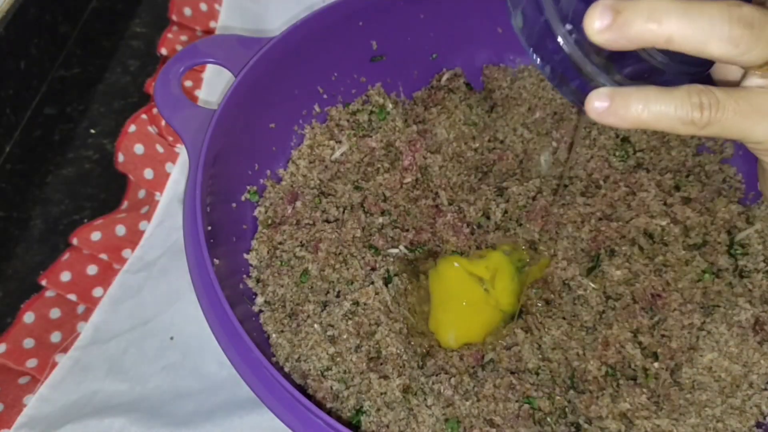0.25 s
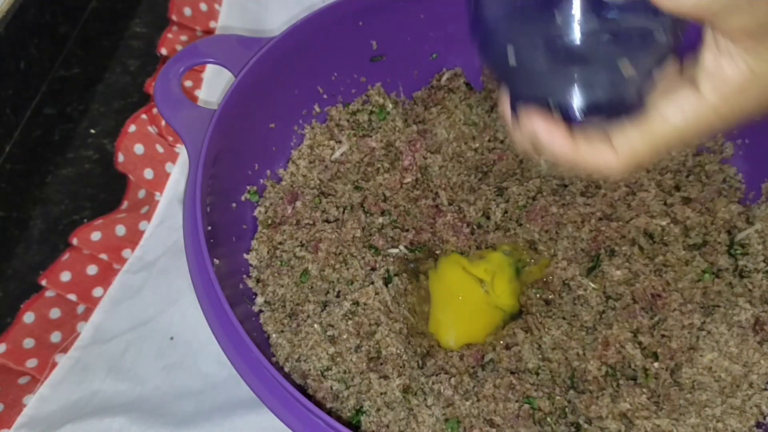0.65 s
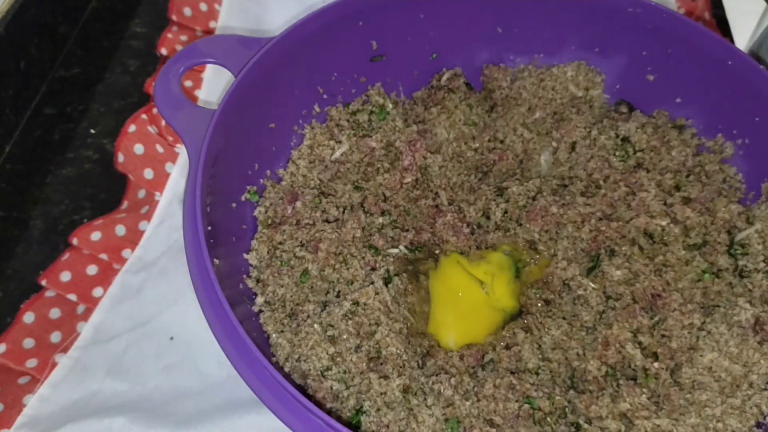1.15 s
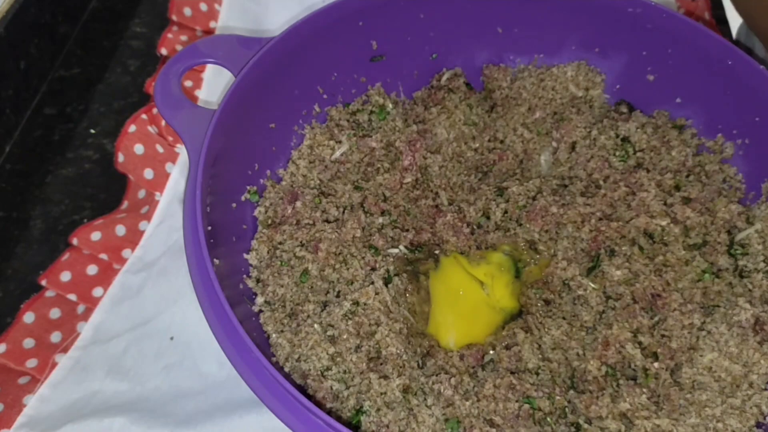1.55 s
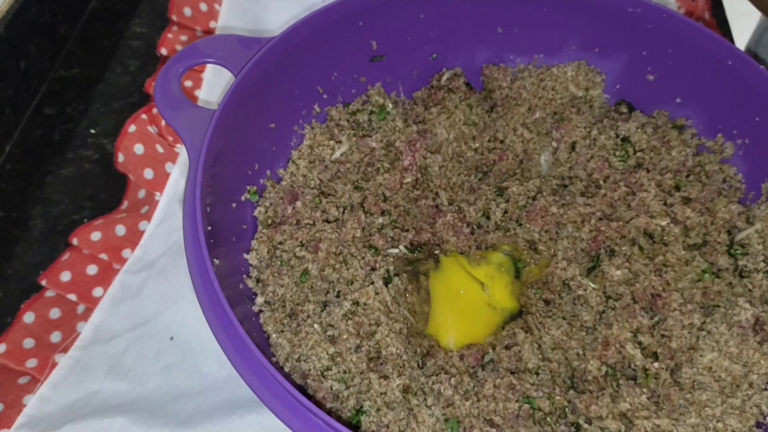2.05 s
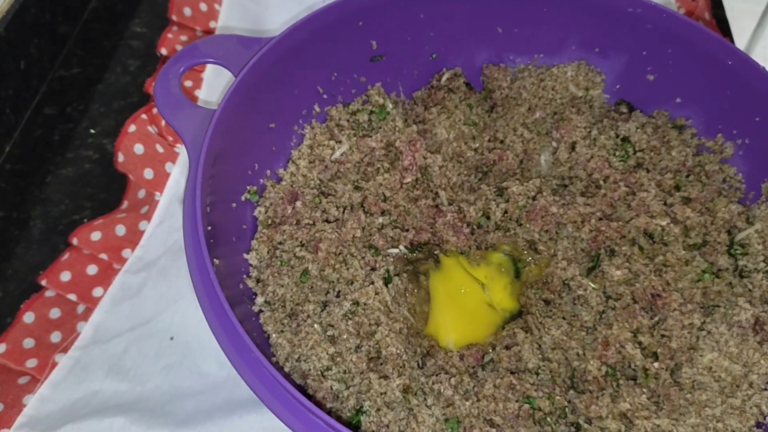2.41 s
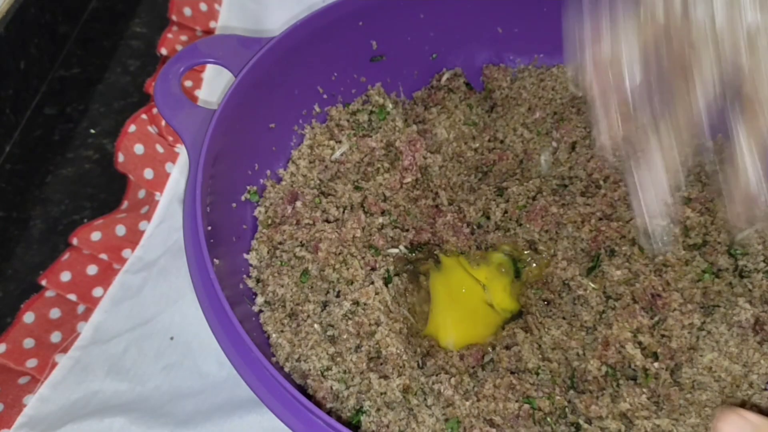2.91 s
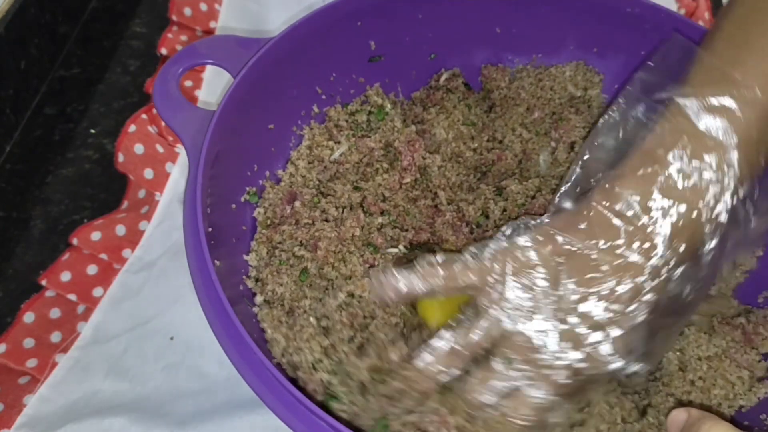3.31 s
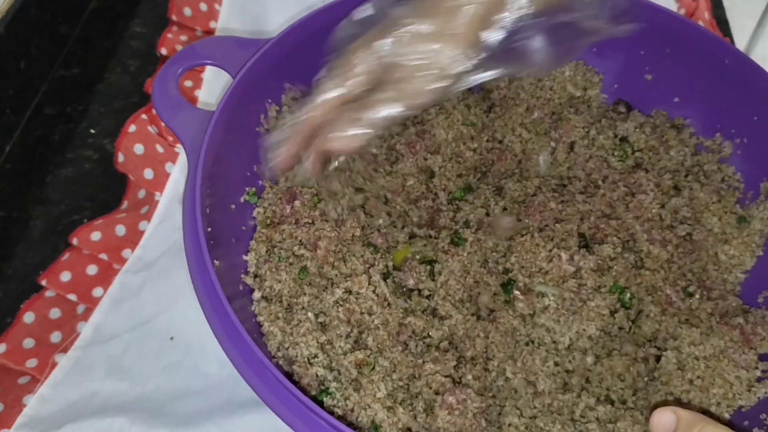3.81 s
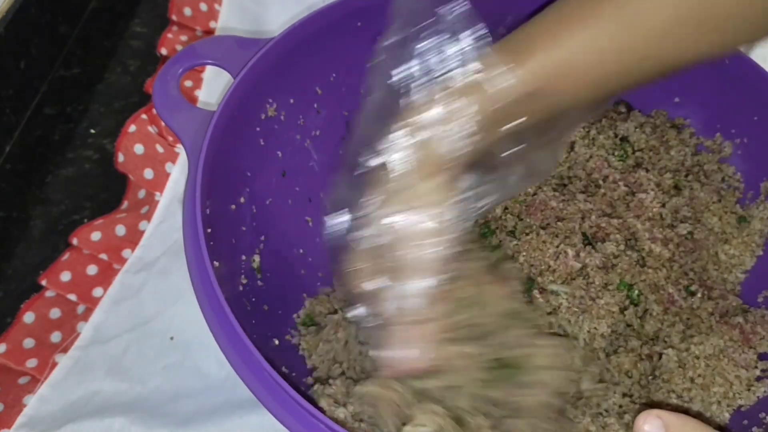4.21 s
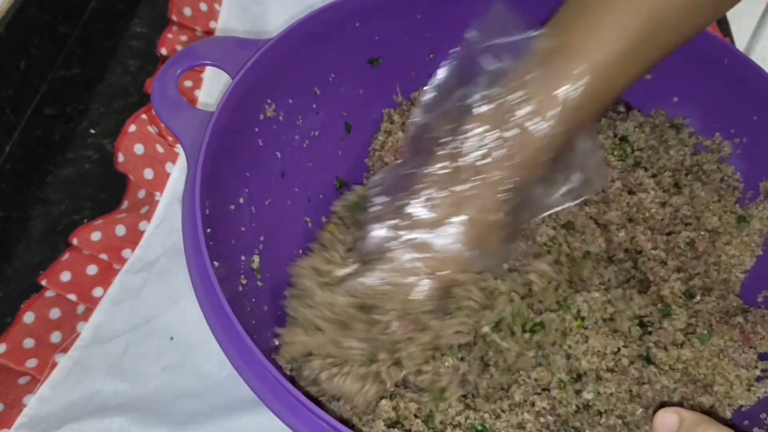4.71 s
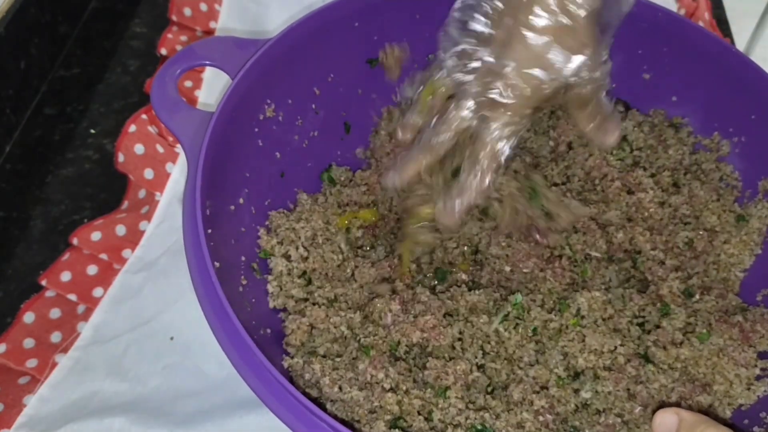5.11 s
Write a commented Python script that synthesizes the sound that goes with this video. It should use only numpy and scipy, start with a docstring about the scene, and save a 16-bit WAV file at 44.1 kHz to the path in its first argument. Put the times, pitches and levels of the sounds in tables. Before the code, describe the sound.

A quiet home kitchen: a faint, slightly unsteady low fridge hum and soft air hiss throughout. From about 0.6 s there are barely audible brushes and slips of a glass dish being carried. Tiny clinks come at 1.2-1.4 s, with scraping until about 1.85 s; a clear, bright, short glass clink stands out at 1.7 s. At 2.34 s the dish lands on the counter with a hard, loud woody knock, and a lighter double tap follows near 2.57 s. Thin plastic crinkles faintly as the glove is drawn snug, 2.3-3.1 s. From 3.1 s the gloved hand works close to the microphone: a sharp crackly first plunge, a longer sweep, a strong stroke brushing the bowl wall at 3.9 s, then more at 4.4, 4.9 and 5.2 s. Crisp film rustle rides over grainy crumb shuffling, moist squelches and small dropping clumps. Hard walls add a short, bright reverberation.

```python
"""A kitchen with a humming fridge: slightly unsteady motor lines over still, softly hissing air.
A small glass dish clinks and slides as it is put aside, modes ringing and fine ticks scraping, and knocks the counter.
Then a hand in a thin plastic glove sweeps through moist mince and grain in a plastic bowl: bursts of coloured ticks.
Hard walls answer with a noise tail; the left microphone port is bright in the top treble."""
import sys
import numpy as np
from scipy import signal
from scipy.fft import rfft, irfft, next_fast_len
from scipy.io import wavfile
from scipy.ndimage import uniform_filter1d, map_coordinates

SR = 44100
rng = np.random.default_rng(int(sys.argv[2]) if len(sys.argv) > 2 else 0)


def generate_wav(sig):
    """Save sig (samples, or channels by samples) to the path in sys.argv[1] as 16-bit PCM at SR."""
    pcm = np.round(np.clip(np.atleast_2d(sig).T, -1, 1) * 32767).astype(np.int16)
    wavfile.write(sys.argv[1], SR, pcm)


N = 235931  # length in samples

# Fridge motor lines. Each row: frequency in Hz, relative level in dB.
HUM_LINES = [(70.0, -61.5), (129.2, -59), (209.9, -64), (279.9, -59.5), (312.2, -58.5), (349.9, -56),
             (522.2, -72.5), (694.4, -68.5)]
# Colour of the still room air. Each row: frequency in Hz, relative level in dB per Hz.
AIR_COLOUR = [(20, -36), (45, -18.5), (70, -9), (140, 2.5), (330, -3.5), (600, -8), (1000, -15),
              (2000, -18), (3200, -18), (3900, -23.5), (4450, -16.5), (5000, -25), (9000, -30.5),
              (14000, -36)]

# Ringing modes of the glass dish. Each row: frequency in Hz, relative level in dB, 60 dB decay in seconds.
GLASS_MODES = [(1095, -38, .25), (2208, -10, .13), (2290, -15, .1), (2385, -15, .08), (2680, -11, .03),
               (2870, -9, .03), (3300, -8, .018), (4710, -18, .05), (5520, -16, .1), (6665, -17, .04),
               (7815, -20, .08), (9340, -23, .05), (9960, -14, .1), (11110, -18, .07), (13210, -21, .1)]
# Contacts of the dish. Each row: start in seconds, level in dB, brightness in dB per octave,
# crack in dB relative to the contact, mode favoured by the spot that is hit in Hz.
DISH_CLINKS = [(1.217, -38, 8, -5, 2120), (1.354, -37.5, 11, 1.5, 5520), (1.366, -40, 6, -3, 5520),
               (1.704, -49, 13, 2, 13200), (1.716, -12.5, 2, -2.5, 1095), (1.748, -25, 0, -4, 2200),
               (1.815, -40, 3, -1, 2200), (1.848, -30.5, -1, -2, 2340), (2.184, -52.5, 4, 8, 13200),
               (2.338, -26, -3, -20.5, 7800), (2.562, -27, 2, -1, 5600), (2.571, -33, -1.5, -7, 2200)]
# Colour of the crack in each clink. Each row: frequency in Hz, relative level in dB per Hz.
CLINK_CRACK_COLOUR = [(100, 22), (900, -2.5), (1800, 7), (2500, 12), (3400, -6), (4300, -8), (6500, 2),
                      (14000, 0)]
# The dish slips in the fingers and along the counter.
# Each row: start in seconds, rise in seconds, hold in seconds, level in dB.
DISH_SLIDES = [(.64, .02, .005, -62), (.825, .006, .006, -64), (.96, 0.029, .01, -64),
               (1.045, 0.024, .01, -55), (1.265, 0.0083, .005, -48), (1.351, 0.0041, 0.0062, -41.5),
               (1.39, 0.051, .01, -40.5), (1.495, 0.028, 0.03, -38.5), (1.6, 0.095, 0.15, -39.5)]
# A faint brushing of the dish, growing as it nears the counter. Each row: start in seconds, rise in seconds,
# hold in seconds, level in dB.
NEARING_BRUSH = [(.6, 1.2, 0.43, -61.5)]
# Colour of slides and brushing. Each row: frequency in Hz, relative level in dB per Hz.
SLIDE_COLOUR = [(300, -25), (1000, -8), (1500, -10.5), (2800, -3.5), (4000, -4), (5500, -3), (7500, -6.5),
                (11000, 0.5), (14000, -0.5)]
# The rim rubs softly. Each row: start in seconds, rise in seconds, hold in seconds, relative level in dB.
RIM_RUBS = [(1.27, 0.011, .005, -45.5), (1.4, 0.12, 0.18, -59)]
# Colour of the rim's rub. Each row: frequency in Hz, relative level in dB per Hz.
RUB_COLOUR = [(600, -11), (1200, -40), (1480, 8), (1680, -12), (1900, -2), (2400, -32), (5000, -26),
              (12000, -30)]
SLIDE_FALL_DB_PER_S, RUB_FALL_DB_PER_S = 162, 400

# Modes of the counter top. Each row: frequency in Hz, relative level in dB, 60 dB decay in seconds.
COUNTER_MODES = [(116, -31, .4), (180, -28, .15), (305, -18, .11), (421, -17.5, .21), (560, -19, .04),
                 (635, -19, .04), (735, -24, .06), (970, -15, .04), (1095, -14, .07), (1130, 3, .009),
                 (1500, -3, .01), (1640, -24, .05), (2150, -6.5, .01), (3100, -10, .01), (4100, -12, .005)]
# The dish lands on it and rocks back.
# Each row: start in seconds, level in dB, brightness in dB per octave, clatter in dB relative to the knock.
COUNTER_KNOCKS = [(2.3363, -5.5, 1, -10), (2.563, -24, -0.5, -16), (2.573, -24, 5, -8)]
# Colour of the clatter in each knock. Each row: frequency in Hz, relative level in dB per Hz.
CLATTER_COLOUR = [(60, -7), (250, -5), (1100, 7), (2200, 3), (3500, -1.5), (4800, -14.5), (7500, -27),
                  (14000, -30)]

# Colour of the crinkling film. Each row: frequency in Hz, relative level in dB per Hz.
FILM_COLOUR = [(200, -19), (700, -12.5), (2000, -3.5), (3500, -2.5), (5000, -0.5), (6700, -2), (8500, -3),
               (11000, 0.5), (15000, -1.5)]
# Single creases of the glove snap. Each row: start in seconds, level in dB.
CREASE_SNAPS = [(3.109, -29), (3.251, -30), (3.714, -33), (3.887, -30), (4.37, -37), (4.838, -32)]
# The glove rustles faintly as soon as the hand is free.
# Each row: start in seconds, rise in seconds, hold in seconds, relative level in dB.
GLOVE_RUSTLE = [(2.34, .02, 7.3, -51.5)]
# The glove is drawn snug beforehand and crinkles briefly. Each row: start in seconds, relative level in dB.
GLOVE_FLEXES = [(2.34, -41.5), (2.49, -48), (2.555, -40.5), (2.745, -44.5), (2.935, -51.5), (3.07, -43.5)]
FLEX_RISE_S, FLEX_HOLD_S, FLEX_FALL_DB_PER_S = 0.012, 0.0086, 222

# Colour of shifting crumbs. Each row: frequency in Hz, relative level in dB per Hz.
CRUMB_COLOUR = [(30, -23), (70, -35), (130, 5), (220, -7.5), (310, 3), (430, 2), (600, -0.5), (850, 1),
                (1300, 1), (1900, 2.5), (2800, -35), (4500, -58), (9000, -13)]
# Colour of the bowl's wall. Each row: frequency in Hz, relative level in dB per Hz.
BOWL_COLOUR = [(500, -43), (1050, -9.5), (1230, 6.5), (1440, 3), (1620, -2), (2200, -2.5), (3000, -6.5),
               (6000, -46)]
# Colour of the wet mince. Each row: frequency in Hz, relative level in dB per Hz.
MINCE_COLOUR = [(150, -32), (350, -5.5), (800, -3), (1600, -24), (2400, -0.5), (3600, 1.5), (5000, -6),
                (9000, -16.5)]
# Clumps of mixture drop back. Each row: start in seconds, relative level in dB.
CLUMP_DROPS = [(3.895, -44), (4.08, -42), (4.82, -42), (4.915, -43.5), (4.99, -44), (5.06, -41.5),
               (5.315, -41.5)]
# A fingertip bumps the bowl's wall. Each row: start in seconds, relative level in dB.
WALL_BUMPS = [(3.208, -36), (4.42, -50.5)]
CLUMP_RISE_S, CLUMP_HOLD_S, CLUMP_FALL_DB_PER_S = 0.0076, 0.0046, 400  # bumps share this shape
UNEVEN_DB, UNEVEN_KNOTS_PER_S = 0.24, 22  # the mixture yields in fits

# Strokes of the hand through the bowl. Each row: start in seconds, rise in seconds, hold in seconds,
# then relative levels in dB of the glove, the crumbs, the bowl's wall and the wet mince.
HAND_STROKES = [(3.085, 0.029, 0.042, -32.5, -36, -49, -60), (3.18, 0.026, 0.18, -42.5, -42, -45, -45),
                (3.87, 0.019, .275, -38, -41, -36.5, -43.5), (4.43, 0.26, 0.16, -37, -50.5, -66, -45),
                (4.896, 0.1, 0.19, -40, -60, -62, -53), (5.206, 0.072, 0.072, -36.5, -45, -63, -45.5)]
# Between strokes the hand keeps stirring gently. Each row: start in seconds, rise in seconds, hold in seconds,
# then relative levels in dB of the glove, the crumbs and the wet mince.
GENTLE_STIR = [(3.1, 0.12, 2.2, -46, -58, -51.5)]
# The fingers clench: film crinkles and mince squelches.
# Each row: start in seconds, then relative levels in dB of the glove and the wet mince.
FINGER_GRIPS = [(3.235, -36.5, -52), (3.56, -39, -49), (3.78, -44, -62), (4.035, -38, -50),
                (4.355, -42, -52), (4.405, -38, -44), (4.815, -35.5, -53), (5.05, -36.5, -45)]
STROKE_SAG_DB_PER_S, STROKE_FALL_DB_PER_S = 11.5, 134  # the push tires, then lets go
WALL_RISE_RATIO = 2  # the fingers take this many times longer to bear on the wall
WALL_FALL_DB_PER_S = 241  # the fingers leave the wall sooner

# Decay of the kitchen walls' answer. Each row: frequency in Hz, 60 dB decay in seconds.
WALL_DECAY = [(100, 0.39), (400, 0.88), (2200, 0.81), (6000, 0.86), (13000, 0.28)]
# Colour of the left microphone port. Each row: frequency in Hz, gain in dB.
LEFT_PORT = [(200, 1.2), (1200, -.3), (5000, -.5), (7000, -2), (9500, 0), (11200, 2), (11750, 8.5),
             (13000, 8.5), (14200, 7.5)]
# Colour of the right microphone port. Each row: frequency in Hz, gain in dB.
RIGHT_PORT = [(200, 0), (1200, 0), (5000, 0), (7000, 3), (9500, -.5), (11500, -6.5), (14300, -0.5)]
BAND_LIMIT_HZ = 14300


def amp(db):
    """Decibels to gain."""
    return 10 ** (np.asarray(db) / 20)


def unit(x):
    """Scale to rms 1."""
    return x / np.sqrt(np.mean(x ** 2) + 1e-20)


def along(points, hz):
    """Read (Hz, value) points on a log frequency axis."""
    f, v = np.transpose(points)
    return np.interp(np.log(hz + 1), np.log(f + 1), v)


def filtered(x, response):
    """Shape x by a gain that is a function of frequency."""
    m = next_fast_len(N + SR // 4)
    spectrum = rfft(x, m) * response(np.fft.rfftfreq(m, 1 / SR))
    return irfft(spectrum, m)[..., :N]


def coloured(x, colour):
    """Give x a colour, at rms 1."""
    return unit(filtered(x, lambda hz: amp(along(colour, hz))))


def wobble(rate):
    """A smooth random curve, rate knots a second."""
    knots = rng.standard_normal(int(N * rate / SR) + 4)
    return map_coordinates(knots, [np.arange(N) * rate / SR])


def add(track, s, sound):
    """Mix a stereo sound into the track at time s."""
    part = track[:, round(s * SR):][:, :sound.shape[1]]
    part += sound[:, :part.shape[1]]


def diffuse(length, merge_hz=520):
    """Stereo noise from all sides: alike at both ports in the bass, unrelated above."""
    mid, side = rfft(rng.standard_normal((2, length)))
    likeness = 0.7 * np.exp(-(np.fft.rfftfreq(length, 1 / SR) / merge_hz) ** 2)
    turn = np.arccos(np.clip(likeness, 0, 1)) / 2
    mid, side = mid * np.cos(turn), side * np.sin(turn)
    return irfft([mid + side, mid - side], length)


def kitchen(x, wet_db, early_db=5, early_s=0.015):
    """Add the walls' answer: strong first echoes, then a tail that dies fastest in the top treble."""
    hz, t, z = signal.stft(diffuse(SR), SR, nperseg=256)
    fade_db = -60 * t / along(WALL_DECAY, hz)[:, None] + early_db * np.exp(-t / early_s)
    tail = signal.istft(z * amp(fade_db) * (t > 0), SR, nperseg=256)[1]
    echo = signal.fftconvolve(x, tail / np.linalg.norm(tail[0]), axes=1)[:, :x.shape[1]]
    return x + amp(wet_db) * echo


def grains(rate, pitch_hz, cycles, spread_db, bed):
    """Dense tiny ticks of random pitch, size and place on a bed of noise, at rms 1."""
    count = int(rate * N / SR)
    when, place, size = rng.random((count, 3)).T
    hz = np.clip(pitch_hz * np.exp(0.598 * rng.standard_normal((count, 1))), 150, SR / 3)
    age = hz * np.arange(128) / SR  # in cycles
    size_gain = amp(-spread_db * np.log(np.maximum(size, .01)))[:, None]
    ticks = size_gain * np.sin(2 * np.pi * age) * np.exp(-age / cycles)
    # a tick's place sets which port it reaches first
    lag = (place - .5) * SR / 2000
    pair = []
    for side in (-1, 1):
        start = np.abs(when * N + side * lag).astype(int)
        at = start[:, None] + np.arange(age.shape[1])
        pair.append(np.bincount(at.ravel(), ticks.ravel(), N)[:N])
    # level the broad spectrum, so that each material can give its own colour
    z = rfft(np.array(pair))
    power = np.mean(np.abs(z) ** 2, axis=0)
    smooth = np.sqrt(np.abs(uniform_filter1d(power, size=4001)) + 1e-12)
    return unit(unit(irfft(z / smooth, N)) + bed * diffuse(N))


def strike(modes, bright, crack_db, crack_colour, crack_t60, contact_ms, lag_ms):
    """One contact: ringing modes and a short noisy crack, reaching the right port a little later."""
    t = np.maximum(np.arange(SR) / SR - np.array([[0], [lag_ms / 1000]]), 0)
    centre_hz = np.exp(np.mean(np.log([hz for hz, _, _ in modes])))
    ring = 0
    for k, (hz, db, t60) in enumerate(modes):
        level_db = db + rng.normal(0, 1) + bright * np.log2(hz / centre_hz)
        ring = ring + (-1) ** k * amp(level_db - 60 * t / t60) * np.sin(2 * np.pi * hz * t)
    crack = amp(crack_db - 60 * t / crack_t60) * coloured(diffuse(N), crack_colour)[:, :SR]
    # the force builds while the contact lasts
    blow = (ring + crack) * (1 - np.exp(-(1000 * t / contact_ms) ** 2))
    # an object radiates little below its lowest mode
    return signal.sosfilt(signal.butter(2, 0.85 * modes[0][0], "high", fs=SR, output="sos"), blow)


def gestures(rows, fall_db_per_s, sag_db_per_s=0):
    """One gain curve per dB column: each row's gesture rises, holds with a sag, then dies away."""
    t, power = np.arange(N) / SR, 0
    for s, rise, hold, *dbs in rows:
        held = t - s - rise
        fade_db = sag_db_per_s * np.clip(held, 0, hold) + fall_db_per_s * np.maximum(held - hold, 0)
        shape = np.clip((t - s) / rise, 0, 1) * amp(-fade_db)
        power = power + np.outer(amp(dbs), shape) ** 2
    return np.sqrt(power)


def twitches(rows, rise_s, hold_s, fall_db_per_s):
    """Brief gestures of one shape, from rows of start and levels."""
    return gestures([(s, rise_s, hold_s, *dbs) for s, *dbs in rows], fall_db_per_s)


def fridge():
    """Motor lines, each drifting a little in level and phase, over the still air of the room."""
    t = np.arange(N) / SR
    hum = 0
    for hz, db in HUM_LINES:
        level = amp(db + 0.48 * wobble(5.1))
        phase = 2 * np.pi * hz * t + .5 * wobble(2.89) + 2 * np.pi * rng.random()
        hum = hum + level * np.sin(phase)
    return amp(-3.5) * hum + amp(-52.5) * coloured(diffuse(N), AIR_COLOUR)


def counter():
    """The counter top's modes knock under the dish: one hard blow, then a lighter double one."""
    out = np.zeros((2, N))
    for s, db, bright, clatter_db in COUNTER_KNOCKS:
        knock = strike(COUNTER_MODES, bright, clatter_db, CLATTER_COLOUR,
                       crack_t60=.09, contact_ms=.55, lag_ms=.18)
        add(out, s, amp(db) * kitchen(knock, wet_db=0))
    return out


def dish(favour_db=8):
    """The glass dish rings at each contact; friction scrapes as fine ticks and rubs as coloured noise."""
    out = np.zeros((2, N))
    for s, db, bright, crack_db, spot_hz in DISH_CLINKS:
        # each spot on the glass drives one group of modes best
        modes = []
        for hz, level, t60 in GLASS_MODES:
            favour = favour_db * np.exp(-(np.log2(hz / spot_hz) / 0.1) ** 2)
            modes.append((hz, level + favour, t60))
        clink = strike(modes, bright, crack_db, CLINK_CRACK_COLOUR,
                       crack_t60=0.021, contact_ms=0.12, lag_ms=0.072)
        add(out, s, amp(db) * kitchen(clink, wet_db=1))
    ticks = grains(rate=4000, pitch_hz=6930, cycles=4.3, spread_db=2.0, bed=0.47)
    scrape = gestures(DISH_SLIDES + NEARING_BRUSH, SLIDE_FALL_DB_PER_S) * coloured(ticks, SLIDE_COLOUR)
    rub = amp(-4.5) * gestures(RIM_RUBS, RUB_FALL_DB_PER_S) * coloured(diffuse(N), RUB_COLOUR)
    return out + kitchen(scrape + rub, wet_db=2.0)


def mixture(push, drag, squeeze):
    """Crumbs shift under push or drops, the bowl's wall answers fingers, and wet mince crackles."""
    drops, bumps = [twitches(rows, CLUMP_RISE_S, CLUMP_HOLD_S, CLUMP_FALL_DB_PER_S)
                    for rows in (CLUMP_DROPS, WALL_BUMPS)]
    crumbs = coloured(grains(rate=900, pitch_hz=1320, cycles=1.3, spread_db=0.5, bed=0.74), CRUMB_COLOUR)
    wall = coloured(grains(rate=380, pitch_hz=1380, cycles=1.9, spread_db=2.0, bed=1.0), BOWL_COLOUR)
    mince = coloured(grains(rate=780, pitch_hz=3040, cycles=6.6, spread_db=-2.0, bed=0.59), MINCE_COLOUR)
    return np.hypot(push, drops) * crumbs + np.hypot(drag, bumps) * wall + squeeze * mince


def glove(motion):
    """Thin film buckles in clumps of tiny ticks as the hand moves; now and then a whole crease snaps."""
    ticks = coloured(grains(rate=3500, pitch_hz=7600, cycles=0.69, spread_db=2.5, bed=0.96), FILM_COLOUR)
    clumped = unit(ticks * amp(0.96 * wobble(70)))
    out = amp(3.5) * motion * clumped
    t = np.arange(SR // 20) / SR
    for s, db in CREASE_SNAPS:
        # differencing tilts the noise towards the treble
        bright_noise = np.diff(rng.standard_normal((2, len(t) + 1))) / 2
        add(out, s, amp(db - 60 * t / .018) * bright_noise)
    return out


def hand():
    """Each stroke drives glove, crumbs, bowl wall and mince together; grips and gentle stirring fill in."""
    motion, push, _, squeeze = gestures(HAND_STROKES, STROKE_FALL_DB_PER_S, STROKE_SAG_DB_PER_S)
    on_wall = [(s, WALL_RISE_RATIO * rise, hold, db) for s, rise, hold, _, _, db, _ in HAND_STROKES]
    drag = gestures(on_wall, WALL_FALL_DB_PER_S, STROKE_SAG_DB_PER_S)
    stir = gestures(GENTLE_STIR, STROKE_FALL_DB_PER_S)
    motion, push, squeeze = np.hypot([motion, push, squeeze], stir)
    grips, flexes = [twitches(rows, FLEX_RISE_S, FLEX_HOLD_S, FLEX_FALL_DB_PER_S)
                     for rows in (FINGER_GRIPS, GLOVE_FLEXES)]
    motion, squeeze = np.hypot([motion, squeeze], grips)
    fidget = np.hypot(flexes, gestures(GLOVE_RUSTLE, FLEX_FALL_DB_PER_S))
    film = glove(np.hypot(motion, fidget))
    yielding = amp(UNEVEN_DB * wobble(UNEVEN_KNOTS_PER_S))
    return film + yielding * mixture(push, drag, squeeze)


def scene():
    """The bowl is close to the microphone; the dish and counter are further off, with more room."""
    return fridge() + counter() + dish() + kitchen(hand(), wet_db=-4)


def record(dry):
    """Each port has its own colour; nothing passes above a narrow slope at the band limit."""
    ports = filtered(dry, lambda hz: amp([along(LEFT_PORT, hz), along(RIGHT_PORT, hz)]))
    return filtered(ports, lambda hz: np.clip((BAND_LIMIT_HZ - hz) / 200 + .5, 0, 1))


dry = scene()
out = record(dry)
generate_wav(out)
```